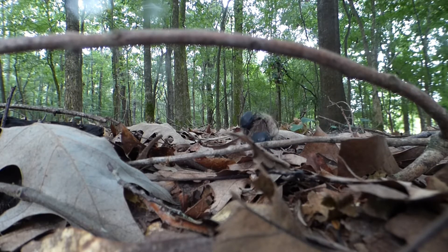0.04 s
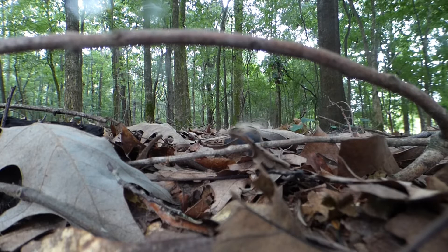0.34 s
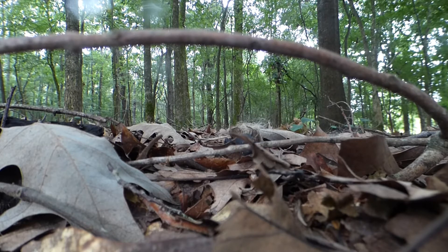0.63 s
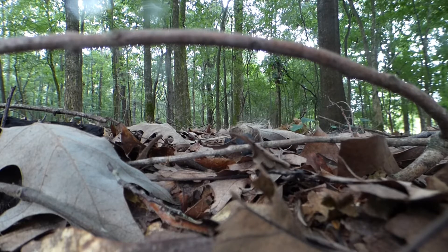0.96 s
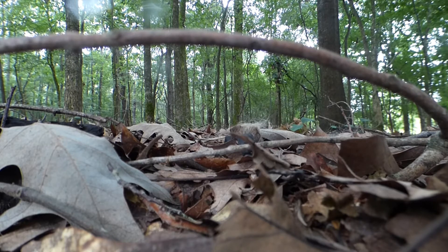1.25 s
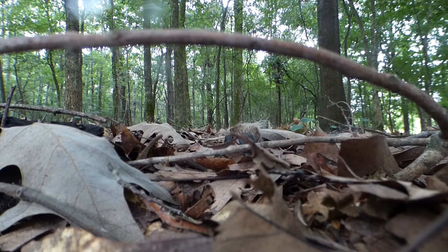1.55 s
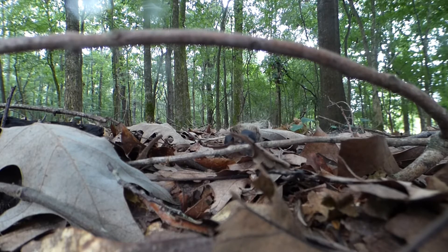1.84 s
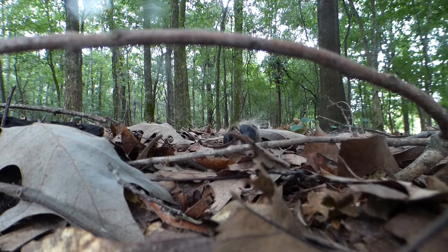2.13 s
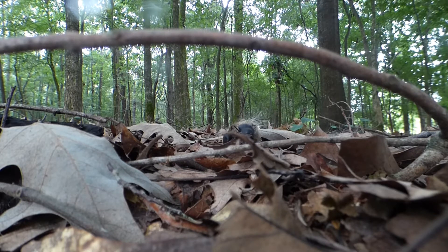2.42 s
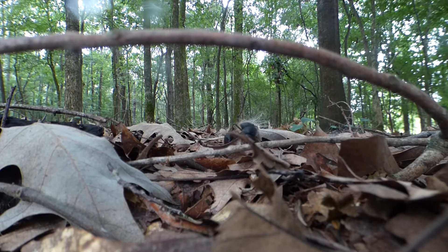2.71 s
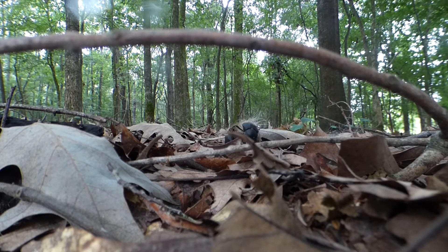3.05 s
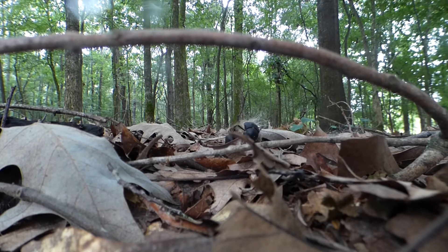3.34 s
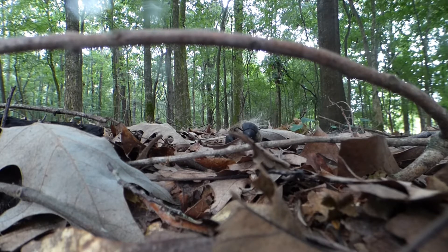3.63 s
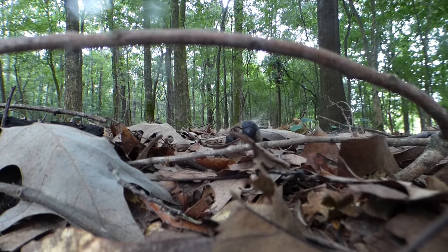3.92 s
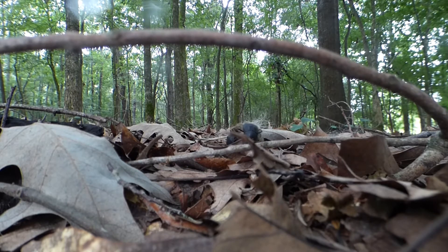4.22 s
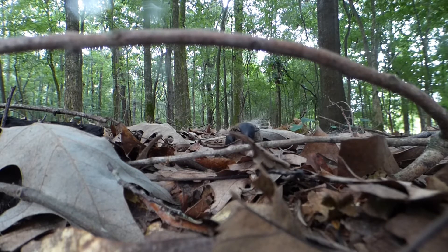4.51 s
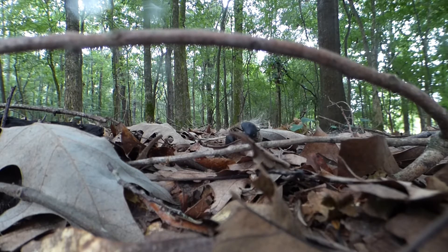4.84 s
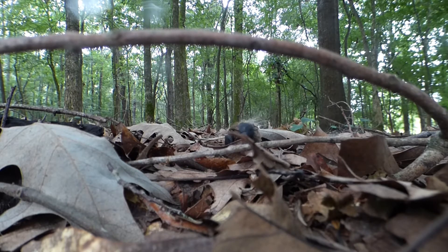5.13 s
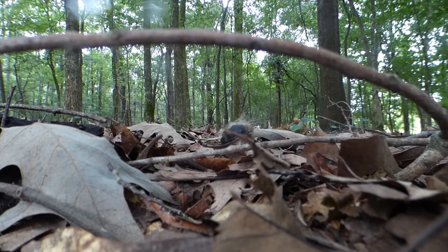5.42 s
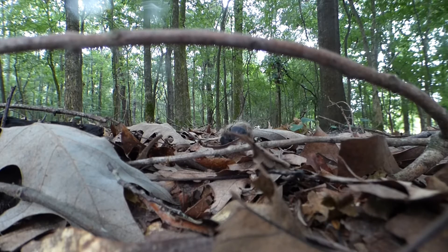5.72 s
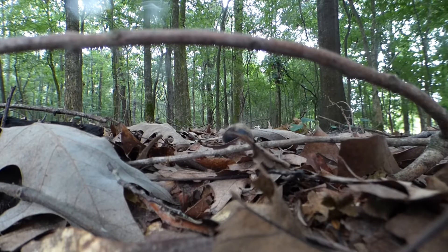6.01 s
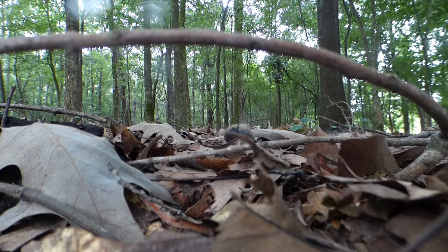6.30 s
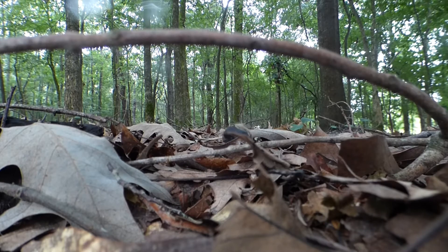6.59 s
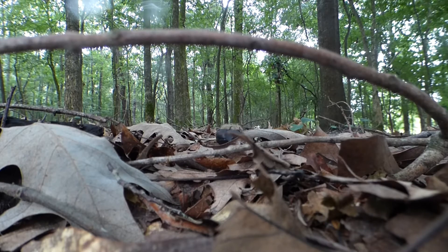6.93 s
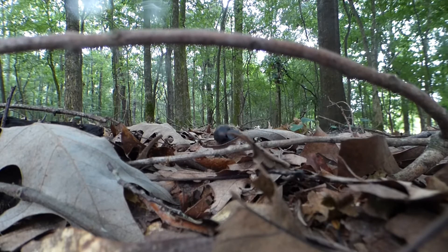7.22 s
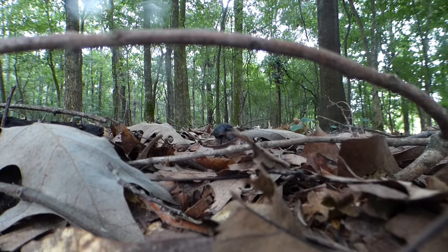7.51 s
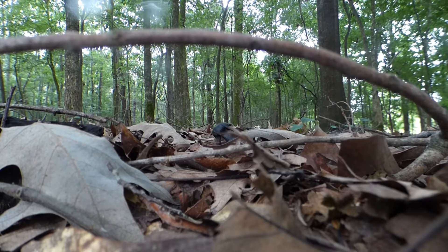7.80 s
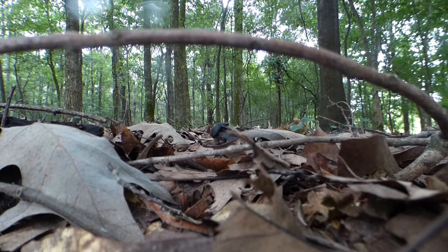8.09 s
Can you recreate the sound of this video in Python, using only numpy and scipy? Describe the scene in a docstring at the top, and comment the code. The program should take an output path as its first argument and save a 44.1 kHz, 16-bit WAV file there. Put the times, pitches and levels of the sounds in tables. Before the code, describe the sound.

From the forest floor, a constant high cicada drone and hiss surround the microphone, with scattered bird chirps echoing among the trunks. Early on come faint dry leaf ticks, one dull twig knock and a thin insect rasp that swells and cuts off. A distant buzz climbs and dies away. Toward the end a closer bird gives a swooping whistle and two quick notes, and far birds keep chipping.

```python
"""A summer wood heard from the leaf litter: cicadas drone throughout over a low distant rumble, and
birds call among echoing trunks. First a small insect ticks at the top of hearing, then scrapes out a
swelling buzz; close by, a beetle stirs, dry leaves tick now and then, and a twig knocks once. Near 3 s
the insect stops short while a far buzz climbs in pitch and fades. Near 6 s the nearest bird whistles
one wide swoop, and a second later two hooked syllables."""
import sys
import numpy as np
from scipy import signal
from scipy.fft import rfft, irfft
from scipy.io import wavfile
from scipy.ndimage import uniform_filter1d

SR = 44100
rng = np.random.default_rng(int(sys.argv[2]) if len(sys.argv) > 2 else 0)


def master(y):
    """Save y as 16-bit WAV."""
    cut = np.clip(np.atleast_2d(y).T, -1, 1)
    pcm = np.round(cut * 32767)  # scale
    wavfile.write(sys.argv[1], SR, pcm.astype(np.int16))


N = 368235
T = np.arange(N) / SR
HZ = np.maximum(np.fft.rfftfreq(N, 1 / SR), 1)


def from_db(db):
    """Decibels to gain."""
    return 10 ** (np.asarray(db) / 20)


def rms_one(x):
    """Scale to unit power."""
    return x / np.sqrt(np.mean(x ** 2) + 1e-20)


def at_hz(points):
    """A curve over frequency, read at every bin."""
    hz, value = np.transpose(points)
    return np.interp(np.log(HZ), np.log(hz), value)


def resonances(modes):
    """Gain by frequency of a few steep-sided resonances."""
    return np.sqrt(sum((from_db(db) / (1 + (2 * (HZ - hz) / width) ** 2)) ** 2 for hz, width, db in modes))


def drift(rate_hz):
    """Smooth random modulation of rms 1."""
    return rms_one(irfft(rfft(rng.standard_normal(N)) / (1 + (HZ / rate_hz) ** 2), N))


def gate(start_s, end_s, attack_s, release_s):
    """An envelope that rises, holds at 1 and falls."""
    return np.clip((T - start_s) / attack_s, 0, 1) * np.clip((end_s - T) / release_s, 0, 1)


def bursts(hits, decay_s):
    """An envelope that jumps at each (t/s, level/dB) and dies away."""
    jumps = np.zeros(N)
    for s, db in hits:
        jumps[max(round(s * SR), 0)] = from_db(db)
    return signal.lfilter([1], [1, -np.exp(-1 / (decay_s * SR))], jumps + 1e-18)


def add(track, s, sound):
    """Mix a sound into a track, starting at s seconds."""
    start = max(round(s * SR), 0)
    track[start:start + len(sound)] += sound[:N - start]


def stereo(mid, side, alike):
    """Left and right from mid and side; the more alike, the narrower the image."""
    return np.sqrt(1 + alike) * mid + np.sqrt(1 - alike) * side * [[1], [-1]]


def surround(colour):
    """Stereo noise of the given colour arriving from all around; rms 1."""
    # likeness of the two ears: f/Hz, correlation
    likeness = [(22, .5), (55, 0.98), (170, 1), (280, 0.96), (450, 0.51), (740, -0.38), (1250, 0.15),
                (2000, 0.53), (3300, 0.87), (6000, 0.8), (9000, 0.81), (15000, 0.18)]
    alike = np.clip(at_hz(likeness), -.999, .999)
    mid, side = rfft(rng.standard_normal((2, N))) * colour
    return rms_one(irfft(stereo(mid, side, alike), N))


def foliage(x, share, spread_s, count=14):
    """Ground and nearby leaves add a few early reflections, so that gliding tones flicker."""
    lags_s = rng.uniform(.0004, spread_s, count)
    gains = rng.choice([-1, 1], count) / np.sqrt(count)
    response = np.zeros(N)
    response[0] = 1
    response[np.maximum(lags_s * SR, 1).astype(int)] = share * gains
    return irfft(rfft(x) * rfft(response), N) / np.sqrt(1 + share ** 2)


def wood_reverb(x, build_s, alike, t60_s=.8, echoes_per_s=2500):
    """Trunks and leaves scatter a sound into a cloud of echoes that builds up and dies away."""
    t = T[:SR]
    echoes = rng.standard_normal((2, SR)) * (rng.random((2, SR)) < echoes_per_s / SR)
    mid, side = echoes * from_db(-60 * t / t60_s) * (1 - np.exp(-t / build_s))
    response = stereo(mid, side, alike)
    response /= np.sqrt(np.sum(response ** 2) / 2)
    return signal.fftconvolve(x[None], response, axes=1)[:, :N]


def background(rumble_db=-42, air_db=-44.5, swell_db=.28):
    """The bed: a far rumble under the even hush of the canopy."""
    # colours of the rumble and of the air of the wood: f/Hz, level/dB
    rumble_colour = [(20, -30), (40, -22), (60, -13.5), (85, -4.5), (120, 1), (175, -.5), (250, -4.5),
                     (335, -9.5), (378, -19.5), (425, -17.5), (520, -17.5), (750, -22.5), (1500, -45)]
    air_colour = [(200, -5.5), (600, 0), (1000, 3), (1500, 1.5), (2000, 0), (2800, 4.5), (3500, -0.5),
                  (4300, 4.5), (5300, 2.5), (7000, -5), (9000, -0.5), (15000, -12)]
    rumble = surround(from_db(at_hz(rumble_colour))) * from_db(rumble_db + swell_db * drift(8.7))
    air = surround(from_db(at_hz(air_colour))) * from_db(air_db)
    return rumble + air


def bird_wash():
    """The furthest birds sing in bouts that merge into a wash."""
    # bouts of song: middle t/s, half length/s, level/dB
    bouts = [(.2, 0.65, -47.5), (1.25, 0.61, -42.5), (3.6, 0.39, -51), (4.4, 0.28, -54), (7.3, 0.75, -43.5)]
    # colour of the wash: f/Hz, level/dB
    colour = [(1900, -21), (2200, -4), (2450, -5), (2700, 6), (3200, 0.5), (3900, 0.5), (4300, -13),
              (4750, 0.5), (5600, -19)]
    singing = sum(from_db(db) * np.exp(-.5 * ((T - s) / half_s) ** 4) for s, half_s, db in bouts)
    return surround(from_db(at_hz(colour))) * singing


def whistle(hz, waver_hz):
    """A bird's near-pure tone of rms 1, its pitch slightly unsteady."""
    wobble = rms_one(uniform_filter1d(rng.standard_normal(len(hz)), size=70))
    return np.sqrt(2) * np.sin(2 * np.pi * np.cumsum(hz + waver_hz * wobble) / SR)


def note(length_s, start_hz, middle_hz, end_hz):
    """A whistle bent through three pitches, with soft ends and a burr."""
    progress = np.linspace(0, 1, int(length_s * SR))
    bend = np.polyfit([0, .5, 1], [start_hz, middle_hz, end_hz], 2)
    return whistle(np.polyval(bend, progress), waver_hz=89.5) * signal.windows.tukey(len(progress), .5)


def slur(length_s, start_hz, end_hz):
    """A note that glides evenly in musical pitch."""
    return note(length_s, start_hz, np.sqrt(start_hz * end_hz), end_hz)


def whoop(low_hz=2685, high_hz=3886, hold_s=.06, lift_s=.12, swell_db=.5):
    """A distant bird holds a low whistle, then lifts it."""
    t = np.arange(0, hold_s + lift_s, 1 / SR)
    lift = np.clip((t - hold_s) / lift_s, 0, 1)
    tone = whistle(low_hz + (high_hz - low_hz) * lift, waver_hz=55)
    return tone * from_db(swell_db * lift) * signal.windows.tukey(len(t), .25)


def stray_notes(count=16, low_hz=2590, high_hz=4140, length_s=.062, glide_octaves=.15):
    """Fainter birds put in slurs at random times and pitches; yields t/s, sound."""
    for k, (when, height, glide) in enumerate(rng.random((count, 3))):
        start_hz = low_hz * (high_hz / low_hz) ** height
        end_hz = start_hz * 2 ** (glide_octaves * (2 * glide - 1))
        yield (k + when) / count * T[-1], slur(length_s, start_hz, end_hz)


def far_calls(scoop_hz=797, chip_period_s=.231):
    """The cue list of calls among the trees: t/s, sound, level/dB, direct send/dB."""
    # short slurred or held notes: t/s, length/s, start f/Hz, end f/Hz, level/dB
    slurs = [(0.194, .06, 2960, 2700, -44), (0.431, 0.041, 3320, 2747, -36),
             (0.472, 0.035, 3870, 3640, -34.5), (0.515, 0.048, 5030, 4100, -33),
             (0.619, 0.057, 4230, 3020, -48), (1.00, 0.049, 3110, 4620, -40),
             (1.184, 0.051, 4640, 3010, -39), (1.474, 0.033, 4600, 3000, -36),
             (1.51, 0.039, 3750, 2240, -35), (1.576, 0.033, 2253, 3290, -35.5),
             (1.616, 0.043, 3360, 3090, -29.5), (2.062, 0.045, 4800, 4190, -44.5),
             (2.093, 0.062, 3490, 2653, -41.5), (2.205, .042, 3420, 2640, -41),
             (2.312, .028, 2295, 2000, -48), (2.818, .11, 4070, 4060, -50),
             (3.27, 0.043, 3680, 3570, -43.5), (3.326, 0.072, 3600, 2365, -44),
             (3.458, .04, 3210, 2670, -44), (3.516, 0.033, 2720, 3530, -38.5),
             (4.02, 0.042, 4670, 3950, -49), (4.284, .08, 4900, 4780, -48),
             (4.345, .047, 4110, 2700, -40.5), (4.468, .029, 3350, 5230, -39),
             (4.504, .03, 4870, 3200, -38), (4.499, 0.17, 2865, 2780, -50.5),
             (4.787, 0.2, 2840, 2763, -50.5), (4.92, .12, 4120, 4960, -48), (5.104, 0.055, 4180, 2630, -39),
             (5.17, 0.063, 3940, 3990, -46), (5.213, 0.049, 2667, 2860, -42.5),
             (5.305, .04, 4220, 5260, -42.5), (5.37, .046, 4000, 3930, -44.5),
             (5.487, 0.045, 4760, 4600, -44), (5.597, 0.034, 4020, 2670, -46.5),
             (6.62, 0.035, 3780, 2640, -40), (7.908, 0.028, 3280, 4100, -41),
             (7.961, 0.018, 2270, 2010, -47), (8.078, 0.041, 4010, 3940, -41.5),
             (8.132, .021, 2350, 2050, -46)]
    # lifting whistles: t/s, level/dB
    whoops = [(0.0, -45.5), (0.72, -45.5), (0.95, -44.5), (1.19, -48), (1.38, -45), (4.22, -49.5),
              (6.34, -46.5), (6.60, -45), (7.23, -43), (7.49, -43), (7.70, -44.5), (7.98, -48)]
    # thin contact calls that scoop up to a held pitch: t/s, length/s, held f/Hz, level/dB
    seets = [(0.633, .055, 7750, -40), (1.904, 0.039, 7350, -33), (2.405, .041, 7590, -38),
             (4.415, .04, 7620, -41), (5.571, 0.041, 7420, -40), (6.10, .035, 7520, -42),
             (7.763, 0.079, 7320, -40.5)]
    # a chip that slides down and settles: length/s, start f/Hz, middle f/Hz, end f/Hz
    chip = (.046, 6000, 4820, 4600)
    # even runs of that chip: start t/s, end t/s, level/dB
    chip_runs = [(0.662, 1.70, -38), (6.518, 7.79, -37)]
    calls = [(s, slur(*shape), db, 1) for s, *shape, db in slurs]
    calls += [(s, whoop(), db, -2) for s, db in whoops]
    calls += [(s, note(length_s, hz - scoop_hz, hz, hz), db, -6) for s, length_s, hz, db in seets]
    for start_s, end_s, db in chip_runs:
        calls += [(s, note(*chip), db, -2.5) for s in np.arange(start_s, end_s, chip_period_s)]
    return calls + [(s, sound, -52, -3) for s, sound in stray_notes()]


def far_birds(echo_db=1.5, through_db=-2):
    """With distance the direct sound fades and mostly echoes arrive."""
    song, direct = np.zeros(N), np.zeros(N)
    for s, sound, db, send_db in far_calls():
        add(song, s, sound * from_db(db))
        add(direct, s, sound * from_db(db + send_db))
    wash = bird_wash()
    through_leaves = from_db(through_db) * foliage(direct, share=.7, spread_s=.016)
    echoes = from_db(echo_db) * wood_reverb(song, build_s=.0047, alike=.79)
    return through_leaves + echoes + wash


def far_buzz(start_s=2.22, end_s=3.86, low_hz=5270, high_hz=7010, half_width_hz=780, level_db=-37):
    """A rasping band, blurred by distance, that swells, climbs once and fades."""
    climb = (1 + np.tanh((T - 3.08) / .2)) / 2   # steepest at 3.08 s
    phase = 2 * np.pi * np.cumsum(low_hz + (high_hz - low_hz) * climb) / SR
    noise = rfft(rng.standard_normal((4, N)))
    rasp = rms_one(irfft(noise / np.sqrt(1 + (HZ / half_width_hz) ** 6), N))
    mid, side = rasp[:2] * np.cos(phase) + rasp[2:] * np.sin(phase)   # shifts the noise up to the pitch
    from_middle = np.clip(2 * (T - start_s) / (end_s - start_s) - 1, -1, 1)
    rough_arch = from_db(level_db - 4.5 * from_middle ** 2 + drift(60))
    sounding = gate(start_s, end_s, attack_s=.15, release_s=.35)
    return (mid + .3 * side * [[1], [-1]]) * rough_arch * sounding


def leaf_litter(body_db=4, crack_db=7, decay_s=.0041):
    """Dry leaves give way with a hollow tick and a bright crack."""
    # ticks of leaves and twigs: t/s, level/dB, brightness/dB
    ticks = [(0.238, -42, 5.5), (0.306, -37.5, -4), (0.350, -47, -6), (0.725, -44, -13), (0.744, -48, 10),
             (0.911, -39.5, 2), (3.135, -46, 8), (4.654, -41, -17), (4.703, -42, -15), (6.032, -44, -8),
             (6.379, -39, -2)]
    # resonances of the hollow body and of the crack: f/Hz, width/Hz, level/dB
    body_modes = [(655, 400, 4), (1530, 860, 1.5), (2300, 700, -7)]
    crack_modes = [(4800, 4100, -1), (9300, 5000, -1)]
    body = bursts([(s, db + body_db) for s, db, _ in ticks], decay_s)
    crack = bursts([(s, db + crack_db + bright) for s, db, bright in ticks], decay_s)
    return surround(resonances(body_modes)) * body + surround(resonances(crack_modes)) * crack


def twig_knock(band_hz=(280, 850)):
    """A soft contact sets two heavily damped modes ringing."""
    # one dull knock: t/s, gain/dB
    knock = (1.0922, -17.5)
    # modes of the twig: f/Hz, t60/s, level/dB
    modes = [(455, 0.029, -14), (640, 0.0065, -1.5)]
    start_s, gain_db = knock
    t, track = T[:SR // 10], np.zeros(N)
    ring = sum(from_db(db - 60 * t / t60) * np.sin(2 * np.pi * hz * t) for hz, t60, db in modes)
    add(track, start_s, from_db(gain_db) * ring)
    return signal.sosfilt(signal.butter(4, band_hz, "band", fs=SR, output="sos"), track)


def syllable(contour, waver_hz):
    """A whistle that follows a short contour of t/s, f/Hz, level/dB."""
    s, hz, db = np.transpose(contour)
    t = np.arange(s[0], s[-1], 1 / SR)
    return whistle(np.interp(t, s, hz), waver_hz) * from_db(np.interp(t, s, db))


def near_bird(direct_db=-.5, echo_db=-1):
    """A whistled swoop and two hooks, just clear of their own echoes."""
    # one wide swoop, down, up and down again: t/s, f/Hz, level/dB
    swoop = [(5.828, 4300, -33.5), (5.856, 3040, -32.5), (5.885, 2900, -35), (5.90, 2300, -40),
             (5.93, 3040, -33.5), (5.95, 3646, -27), (5.988, 5140, -29.5), (6.012, 3744, -24),
             (6.024, 3430, -43)]
    # the hooked syllable, a dip and a climb: t/s from its start, f/Hz, level/dB
    hook = [(0, 2990, -13), (.012, 3055, -1), (.024, 2800, -12), (.036, 2330, -14), (.052, 2655, -15),
            (.064, 3050, -3), (.083, 3454, -8), (.100, 3830, -7), (.112, 4000, -20)]
    # cues of the hook: t/s, gain/dB
    hook_cues = [(6.820, -23), (7, -22.5)]
    song = np.zeros(N)
    add(song, swoop[0][0], syllable(swoop, waver_hz=95))
    for s, db in hook_cues:
        add(song, s, from_db(db) * syllable(hook, waver_hz=80))
    direct = foliage(song, share=.53, spread_s=.012) * from_db([[.6], [-.6]])   # a touch left
    echoes = wood_reverb(song, build_s=.0064, alike=.85)
    return from_db(direct_db) * direct + from_db(echo_db) * echoes


def near_insect(tick_period_s=.0931, strokes_per_s=32, run_s=.7, full_s=1.1, swell_db_per_s=2.3):
    """A file drawn over a scraper: eight single strokes, then a fast crescendo that stops short."""
    # colour of the rasp: f/Hz, level/dB
    colour = [(9000, -16), (11500, -4), (13200, 0), (14200, 4), (15800, -1)]
    cycles = np.cumsum(strokes_per_s * (1 + .1 * drift(8))) / SR
    strokes = rms_one(from_db(4.5 * np.sin(2 * np.pi * cycles) + 2 * drift(40)))
    effort = gate(run_s, end_s=2.98, attack_s=full_s - run_s, release_s=.05)
    run = strokes * effort * from_db(-50.5 + swell_db_per_s * (T - full_s))
    singles = bursts([(.009 + k * tick_period_s, -31) for k in range(8)], decay_s=.005)
    ticks = uniform_filter1d(singles, size=220)   # each stroke takes a moment to bite
    idle = from_db(-57) * np.clip(1 - T / full_s, 0, 1) ** .3   # a faint rasp between the single strokes
    rasp = (run + ticks + idle) * surround(from_db(at_hz(colour)))
    return foliage(rasp, share=.35, spread_s=.0027) * from_db([[-.7], [.7]])   # a touch right


def cicadas(chorus_db=-36.5, flutter_db=.8, sway_db=.55):
    """Countless tymbal clicks merge into noise in the body resonances; smaller insects hiss above."""
    # body resonances of the cicadas: f/Hz, width/Hz, level/dB
    modes = [(6090, 896, 0), (7900, 630, -12), (9350, 580, -14)]
    # fader ride of the small insects' hiss: t/s, level/dB
    hiss_ride = [(0, -44), (1.5, -46), (2.4, -44.3), (3.55, -46), (3.8, -49.5), (4.6, -49.5), (5.7, -45.5),
                 (8.35, -46)]
    # colour of that hiss: f/Hz, level/dB
    hiss_colour = [(7000, -11.5), (8800, 0), (10000, 1), (11800, 2.5), (13000, -2), (14200, -12),
                   (15800, -27)]
    drone = surround(resonances(modes)) * from_db(chorus_db + sway_db * drift(2) + flutter_db * drift(120))
    hiss_db = np.interp(T, *np.transpose(hiss_ride))
    hiss = surround(from_db(at_hz(hiss_colour))) * from_db(hiss_db + sway_db * drift(6) + .5 * drift(40))
    return foliage(drone + hiss * from_db([[-.7], [.7]]), share=.17, spread_s=.03)


def scene():
    """Insects, birds and the forest floor together."""
    insects = cicadas() + near_insect() + far_buzz()
    return insects + near_bird() + far_birds() + leaf_litter() + twig_knock() + background()


def record(dry):
    """A steep low-pass takes off the top above 15.7 kHz."""
    return signal.sosfilt(signal.ellip(12, .1, 70, 15700, fs=SR, output="sos"), dry)


dry = scene()
out = record(dry)
master(out)
```